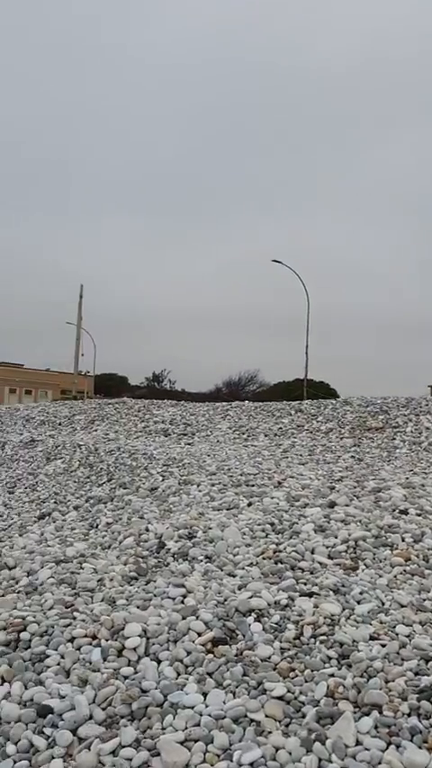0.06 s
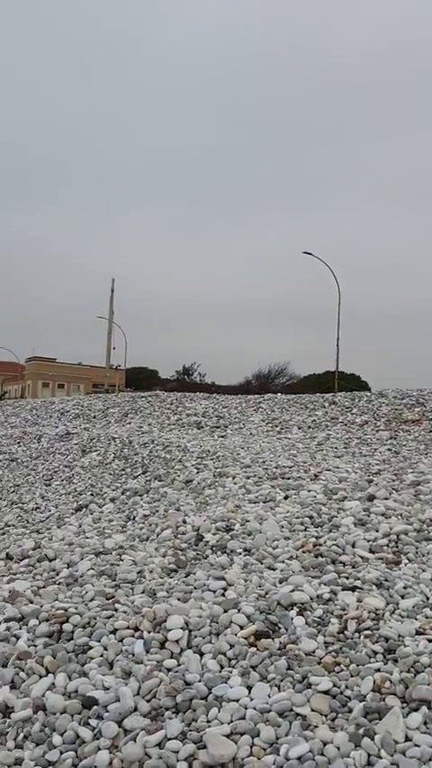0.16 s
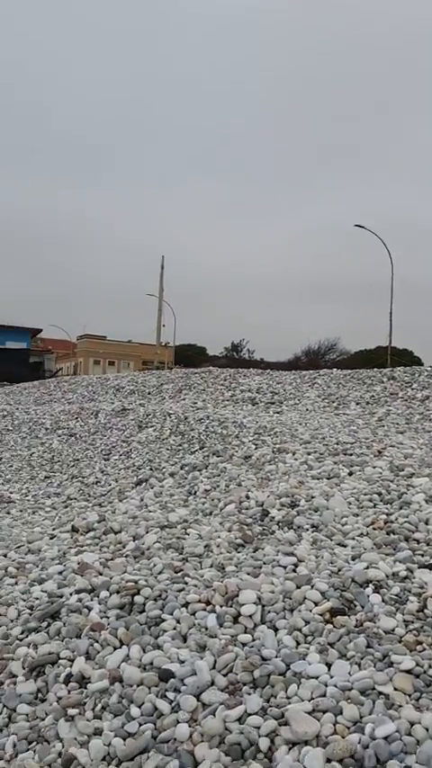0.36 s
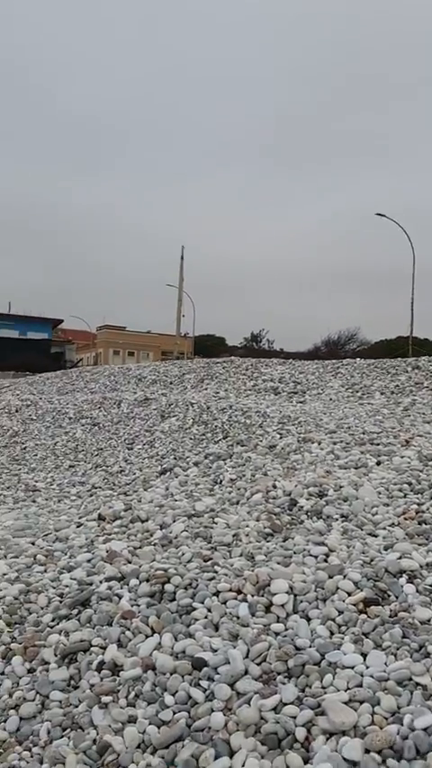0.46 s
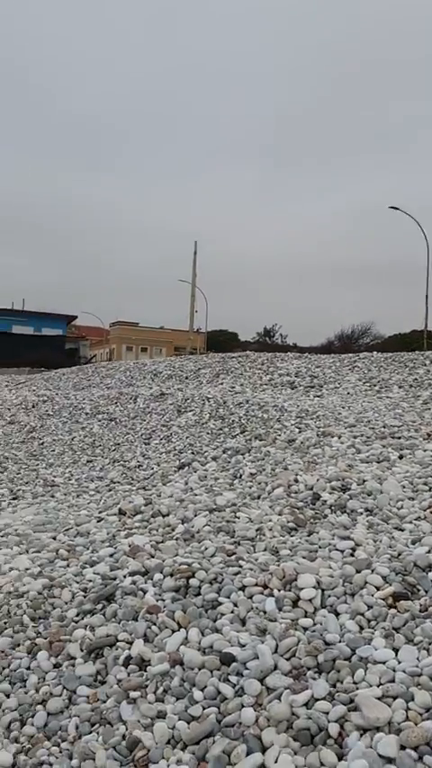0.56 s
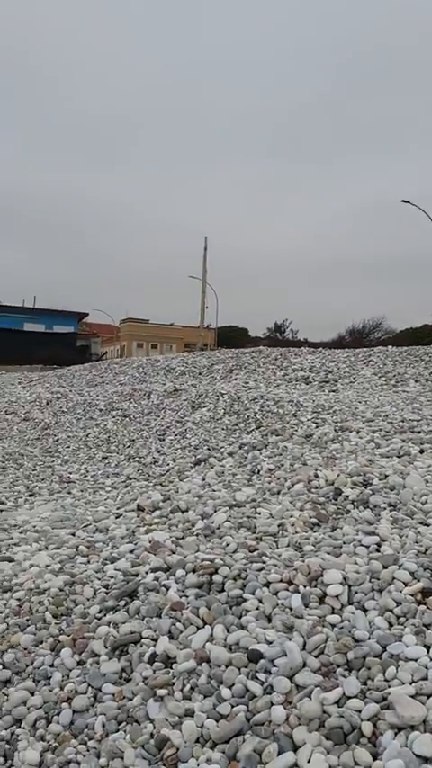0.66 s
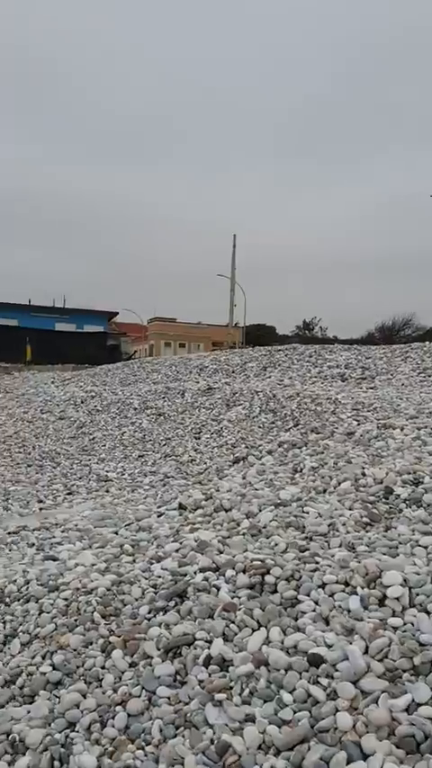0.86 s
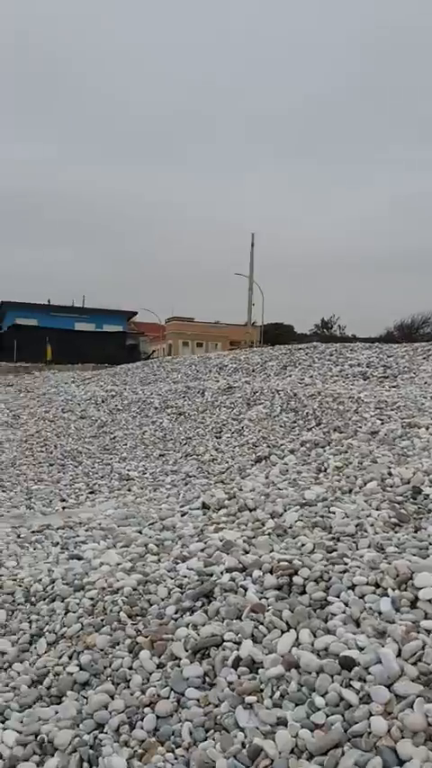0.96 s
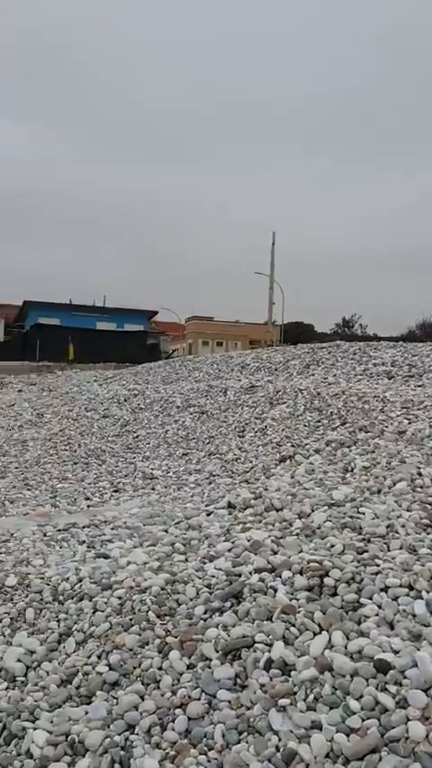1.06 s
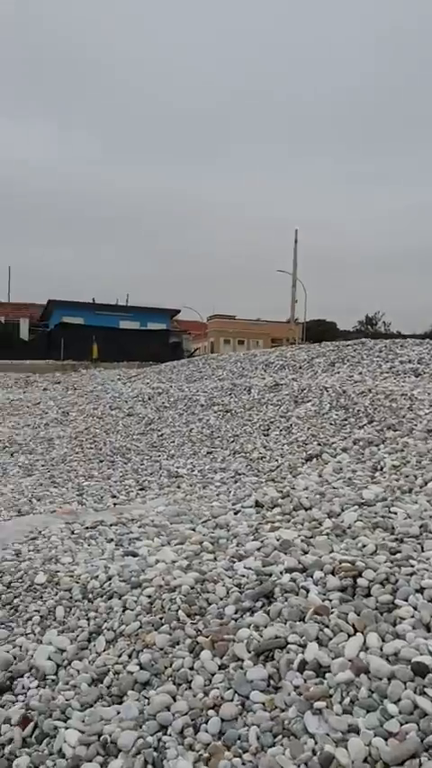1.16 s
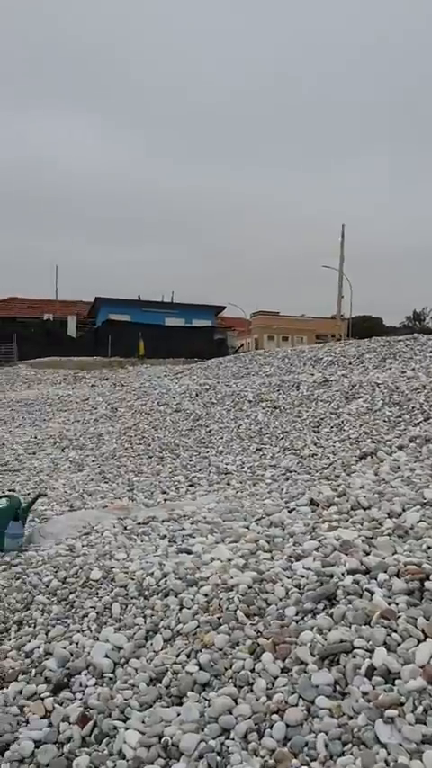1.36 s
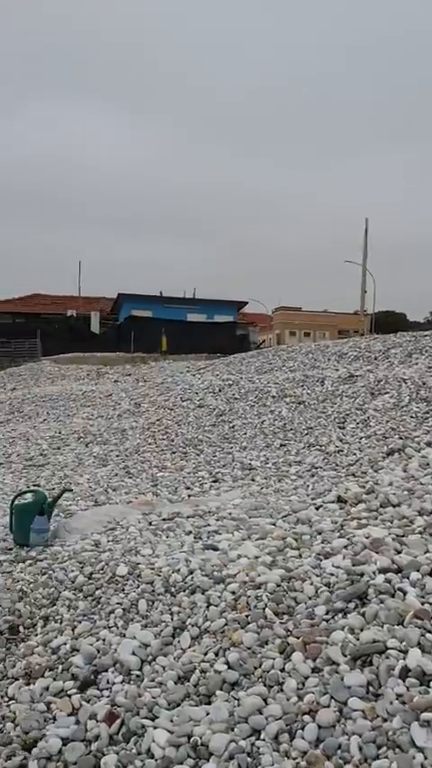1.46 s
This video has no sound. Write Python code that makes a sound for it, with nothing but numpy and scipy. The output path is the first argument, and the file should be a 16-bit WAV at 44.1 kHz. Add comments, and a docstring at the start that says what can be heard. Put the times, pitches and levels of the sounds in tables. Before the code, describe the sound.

Two close footsteps crunch over loose pebbles in irregular bright bursts, with stone knocks and small metallic clinks, then a light trickle; open beach, low rumble and faint hiss, stereo microphone nearby, steps slightly left.

```python
"""A beach of loose pebbles: two footsteps close by, a little to the left, with loose metal (keys or a chain).
Each step is a run of short bursts of random collisions, filtered into crack and crunch, ringing bright modes.
Decaying sines add metal clinks, hollow notes and a thin ring; shaped noise ticks are knocking stones.
Noise thuds and low sine bumps are the foot; sparse ticks trickle over low rumble and faint hiss."""
import sys
import numpy as np
from scipy import signal
from scipy.fft import rfft, irfft
from scipy.io import wavfile
from scipy.ndimage import uniform_filter1d

SR = 44100
rng = np.random.default_rng(int(sys.argv[2]) if len(sys.argv) > 2 else 0)


def master(y):
    """Save y as 16-bit WAV."""
    cut = np.clip(np.atleast_2d(y).T, -1, 1)
    pcm = np.round(cut * 32767)  # scale
    wavfile.write(sys.argv[1], SR, pcm.astype(np.int16))


N = 66150
T = np.arange(N) / SR


def amp(db):
    """Decibels to gain."""
    return 10 ** (np.asarray(db) / 20)


def unit(x):
    """Scales to rms 1."""
    return x / np.sqrt(np.mean(x ** 2) + 1e-20)


def read(points, hz):
    """Interpolates a spectrum table on a log-frequency axis."""
    f, value = np.transpose(points)
    return np.interp(np.log(hz + 1), np.log(np.abs(f) + 1), value)


def colour(x, db_at, size=4096):
    """Minimum-phase filter of unit energy with the given dB response, via the folded cepstrum."""
    db = np.maximum(db_at(np.fft.rfftfreq(size, 1 / SR)), -90)
    cepstrum = irfft(np.log(amp(db)))
    cepstrum[1:size // 2] *= 2
    cepstrum[size // 2 + 1:] = 0
    taps = irfft(np.exp(rfft(cepstrum)))
    return signal.fftconvolve(x, taps / np.linalg.norm(taps))[:len(x)]


def shaped(x, points):
    """Colours a sound by a spectrum table."""
    return colour(x, lambda f: read(points, f))


def band(x, hz, octaves):
    """A broad resonance around hz."""
    def db_at(f):
        offset = np.log2((f + 1) / hz) / octaves
        return -20 * np.log10(1 + offset ** 2 / 2)
    return colour(x, db_at)


def random_signs(count):
    """Random polarity per sample."""
    return rng.choice([-1., 1.], count)


def hits(rate_per_s, spread_db):
    """Random collisions of uneven size, levelled towards a steady mean power."""
    size = amp(spread_db * np.minimum(rng.exponential(1, N), 4))
    x = size * random_signs(N) * (rng.random(N) < rate_per_s / SR)
    power = np.abs(uniform_filter1d(x ** 2, size=300))
    return x / np.sqrt(power + 0.0017)


RING_RISE_S = 0.00044


def ring(start_s, hz, db, t60_s):
    """One partial: a sine of random phase, quick linear rise, exponential decay."""
    t = np.maximum(T - start_s, 0)
    level = amp(db - 60 * t / t60_s) * np.minimum(t / RING_RISE_S, 1)
    return level * np.sin(2 * np.pi * (hz * t + rng.random()))


# bursts of collisions: t/s, length/s, level/dB, relative crunch level/dB
BURSTS = [(0.2366, 0.0034, -34.5, -6.5), (0.273, 0.012, -34.5, -6.5), (0.296, 0.041, -43.5, -8),
          (0.33, 0.0054, -33.5, -24), (0.336, 0.015, -36, 1), (0.367, 0.022, -39.5, -2),
          (0.402, 0.0034, -35, -7), (0.423, 0.033, -45, 3), (0.4396, 0.0069, -32, -5),
          (0.451, 0.022, -35, -1.5), (0.475, 0.0046, -31, -9), (0.483, 0.0025, -26.5, -2),
          (0.497, 0.008, -41, 5.5), (0.516, 0.0096, -37, 2.5), (0.532, 0.017, -36.5, -2),
          (0.559, 0.03, -38, 1.5), (0.584, 0.0068, -38, 3), (0.605, 0.089, -49.5, -9),
          (0.679, 0.021, -50, 11), (0.894, 0.022, -44.5, -3.5), (0.9115, 0.0051, -34.5, -3.5),
          (0.922, 0.0069, -53.5, 12), (.963, 0.0098, -30.5, -6.5), (0.97, 0.011, -35, 5),
          (1.008, 0.021, -33, -3.5), (1.033, 0.0064, -39.5, 2.5), (1.054, 0.033, -37.5, -2),
          (1.065, 0.017, -30, 1), (1.087, 0.015, -33, -4), (1.113, 0.011, -30.5, -2),
          (1.1607, 0.0027, -40.5, 0.5), (1.184, 0.015, -50, 9)]
# spectrum of the cracks: f/Hz, level/dB
CRACK_SPECTRUM = [(1410, -44.5), (2400, -5.5), (3220, -13.5), (4640, 0.5), (7060, -3.5), (9110, -1),
                  (14000, -5.5), (15100, -3.5), (16000, -30)]
# spectrum of the low crunch: f/Hz, level/dB
CRUNCH_SPECTRUM = [(150, -20), (450, -7), (750, -14), (1150, -3.5), (1500, -2), (2200, 4.5), (3200, .5),
                   (4400, 1), (6000, -6), (10000, -20)]
# ringing modes shared by all collisions: f/Hz, relative level/dB, t60/s
MODES = [(2440, -11, .1), (2700, -13, .09), (4350, -9, .1), (4735, -7, .07), (5295, -8, .08),
         (6470, -8, .09), (7440, -7, .09), (8125, 0, .09), (8980, -1, .09), (9690, 0, .1), (10160, -3, .11),
         (10650, -5, .06), (11730, -3, .08), (12200, -8, .08), (13230, -10, .07)]
HITS_PER_S, SIZE_SPREAD_DB = 1900, 3
SWELL = .15  # share of a burst's length over which it builds up
RELEASE_S = 0.013
SETTLE_DB, SETTLE_S = -23, 0.016  # stones keep shifting after each burst
CLUSTER_DB, CLUSTER_S = 3, .0022  # short resonances of each stone cluster, dB re direct hit
STONE_SPREAD_OCT = .16  # each burst moves stones of a different size
CRACK_DB, CRUNCH_DB, RING_DB = -3.8, -7.5, -7


def burst_level(t, length_s):
    """Linear build-up, hold, then the louder of fast release and settling tail."""
    after = np.maximum(t - length_s, 0)
    release = np.exp(-after / RELEASE_S)
    settle = amp(SETTLE_DB) * np.exp(-after / SETTLE_S)
    return np.minimum(t / (SWELL * length_s), 1) * np.maximum(release, settle)


def stone_cluster(count=512):
    """Impulse response of a stone cluster: direct hit plus decaying noise, unit energy."""
    cluster = rng.standard_normal(count) * np.exp(-T[:count] / CLUSTER_S)
    cluster *= amp(CLUSTER_DB) / np.linalg.norm(cluster)
    cluster[0] = 1
    return cluster / np.linalg.norm(cluster)


def mode_rings(drive, t):
    """Collisions of random polarity excite decaying sines."""
    rings = np.zeros(N)
    total = np.linalg.norm([amp(db) for _, db, _ in MODES])
    for hz, db, t60_s in MODES:
        mode = np.exp(-np.log(1000) * t / t60_s) * np.sin(2 * np.pi * hz * t)
        excitation = drive * random_signs(N)
        rings += amp(db) / total * signal.fftconvolve(excitation, mode / np.linalg.norm(mode))[:N]
    return rings


def bursts(size=8192):
    """Each burst of collisions cracks, crunches and sets the modes ringing."""
    drive, crunch = np.zeros((2, N))
    collisions = hits(HITS_PER_S, SIZE_SPREAD_DB)
    t = T[:size]
    for start_s, length_s, db, crunch_db in BURSTS:
        first = round(start_s * SR)
        span = slice(first, first + size)
        blows = amp(db) * burst_level(t, length_s) * collisions[span]
        cluster = stone_cluster()
        drive[span] += signal.fftconvolve(blows, cluster)[:size]
        grind = signal.fftconvolve(blows * random_signs(size), cluster)[:size]
        stone = 2 ** (STONE_SPREAD_OCT * rng.uniform(-1, 1))
        crunch[span] += amp(crunch_db) * colour(grind, lambda f: read(CRUNCH_SPECTRUM, f * stone))
    crack = shaped(drive, CRACK_SPECTRUM)
    return amp(CRACK_DB) * crack + amp(CRUNCH_DB) * crunch + amp(RING_DB) * mode_rings(drive, t)


# clear metal clinks that stand out of the bursts: t/s, f/Hz, level/dB, t60/s
CLINKS = [(0.2362, 2584, -50.5, 0.23), (0.2379, 5305, -37, 0.18), (0.235, 6110, -39, 0.08),
          (0.2368, 9680, -38, 0.21), (0.2355, 11680, -39, 0.83), (.275, 10220, -38, 0.53),
          (0.287, 8980, -44, 0.32), (.338, 9700, -31.5, 0.085), (.372, 8100, -36, 0.063),
          (0.404, 8900, -39, 0.38), (.4445, 8050, -24, 0.064), (0.4449, 8940, -28.5, 0.15),
          (0.444, 9930, -30, 0.088), (.486, 9870, -26.5, 0.13), (0.487, 10350, -30, 0.053),
          (.495, 8100, -37, 0.091), (.533, 2456, -34.5, 0.12), (0.546, 7440, -41.5, 0.13),
          (.915, 11440, -24, 0.034), (1.014, 11670, -31.5, 0.079), (1.07, 2695, -35, 0.12),
          (1.114, 10020, -30.5, 0.061), (1.219, 3096, -52, 0.23), (1.161, 11710, -32.5, 0.049),
          (1.162, 10060, -51.5, 0.6)]
# hollow notes of deeper stones under the second step: f/Hz, level/dB, t60/s
HOLLOW = [(557, -51, 0.23), (840, -44, 0.13), (1132, -40, 0.16), (1710, -36, 0.14)]
HOLLOW_AT_S = 1.07
# loose metal pieces (keys or a chain) keep touching and roughen the ringing note
CHATTER, CHATTER_S = .7, .0025


def clinks():
    """Loose metal rings single notes, roughened by slow noise; deeper stones add a hollow knock."""
    keep = np.exp(-1 / (CHATTER_S * SR))
    out = sum(ring(HOLLOW_AT_S, *mode) for mode in HOLLOW)
    for clink in CLINKS:
        chatter = unit(signal.lfilter([1], [1, -keep], rng.standard_normal(N)))
        out += ring(*clink) * (1 + CHATTER * chatter)
    return out


# single stones knocking: t/s, peak level/dB before the ports, f/Hz
KNOCKS = [(.0612, -25, 3730), (.0675, -34, 3220), (.1035, -29, 4730), (.1612, -30.5, 11500),
          (0.2362, -24, 6070), (.3452, -20, 4500), (.3548, -16, 8000), (.4078, -15, 4900),
          (.4848, -12, 3900), (.5377, -19, 2300), (.6415, -33, 2660), (.6545, -25, 6800),
          (.6858, -24, 4970), (.7855, -35.5, 1880), (.810, -37, 850), (.8145, -34, 1240),
          (.8545, -20, 2140), (1.0395, -25, 3520), (1.0695, -25, 2100), (1.114, -14.5, 4500),
          (1.121, -23.5, 1550), (1.125, -20, 7400), (1.163, -30, 9000), (1.199, -27, 2920),
          (1.2808, -32, 2980), (1.312, -36.5, 3100), (1.3455, -32.5, 1620), (1.3639, -37, 1420),
          (1.369, -37.5, 473), (1.3825, -33, 3900), (1.407, -35, 4070), (1.4535, -43, 2580)]
KNOCK_WIDTH_OCT = 0.57
KNOCK_S, KNOCK_TAIL_DB, KNOCK_TAIL_S = 0.00009, -25, 0.01
KNOCK_TOP_HZ = 11000  # rounded stones strike softly above this


def knocks(size=2048):
    """One stone strikes another: an impulse with a brief noise rattle, band-shaped."""
    out, t = np.zeros(N + size), T[:size]
    soften = signal.butter(1, KNOCK_TOP_HZ, fs=SR)
    for start_s, db, hz in KNOCKS:
        decay = np.exp(-t / KNOCK_S) + np.exp(-t / KNOCK_TAIL_S) / 2
        blow = amp(KNOCK_TAIL_DB) * decay * rng.standard_normal(size)
        blow[0] = 1
        tick = signal.lfilter(*soften, band(blow, hz, KNOCK_WIDTH_OCT))
        out[round(start_s * SR):][:size] += amp(db) * tick / np.abs(tick).max()
    return out[:N]


# dull pushes of the foot into the bed: t/s, rise/s, decay/s, level/dB, centre f/Hz
THUDS = [(0.24, 0.025, 0.047, -54, 207), (0.511, 0.01, 0.033, -53, 305), (0.59, 0.027, 0.062, -42.5, 268),
         (.79, 0.03, 0.056, -50.5, 553), (0.873, 0.018, 0.016, -48, 89), (1.021, 0.017, 0.054, -49.5, 65),
         (1.039, 0.017, 0.033, -48.5, 270), (1.36, 0.1, 0.064, -51.5, 193)]
THUD_WIDTH_OCT = .9


def thuds():
    """The foot's weight shifts deeper stones: band noise, its envelope flattened, then swelled and decayed."""
    out = np.zeros(N)
    for start_s, rise_s, decay_s, db, hz in THUDS:
        t = np.maximum(T - start_s, 0)
        level = np.minimum(t / rise_s, 1) * np.exp(-np.maximum(t - rise_s, 0) / decay_s)
        rumble = band(rng.standard_normal(N), hz, THUD_WIDTH_OCT)
        even = np.cos(np.angle(signal.hilbert(rumble)))
        push = level * band(even, hz, THUD_WIDTH_OCT)
        out += amp(db) * push * np.linalg.norm(level) / np.linalg.norm(push)
    return out


# soft bumps of heel and sole: t/s, f/Hz, level/dB before low-pass, t60/s
BUMPS = [(.056, 56, -41, .2), (.4915, 340, -35, .03), (.4955, 120, -41, .04), (.596, 335, -41, .09),
         (.637, 285, -41, .07), (.691, 205, -41, .07)]


def bumps():
    """Heel and sole land with short low sines, low-passed an octave above pitch."""
    out = np.zeros(N)
    for start_s, hz, db, t60_s in BUMPS:
        out += signal.lfilter(*signal.butter(2, 2 * hz, fs=SR), ring(start_s, hz, db, t60_s))
    return out


# thin ring hanging from earlier: f/Hz, level/dB, t60/s
HANGING = [(1652, -56, .45), (4344, -47, .85), (5303, -59, .7), (6772, -62, .45), (7574, -62, .4),
           (8376, -60, .8), (8866, -54, .32), (9065, -55, .6), (9905, -56, .55), (10178, -49.5, .6)]
DAMPED_S = 0.34


def hanging_ring():
    """Long partials die away until the first step damps them."""
    damping = np.exp(-np.maximum(T - DAMPED_S, 0) / RELEASE_S)
    return sum(ring(0, *partial) for partial in HANGING) * damping


# course of the gravel trickle: t/s, level/dB
TRICKLE_LEVEL = [(0, -55), (.12, -59), (.22, -62.5), (.3, -52), (.6, -48), (.72, -50), (.78, -57.5),
                 (.88, -53.5), (1.15, -51.5), (1.25, -55.5), (1.32, -61.5), (1.5, -53.5)]
# spectrum of the trickle: f/Hz, level/dB
TRICKLE_SPECTRUM = [(290, -25.5), (500, -6), (954, -6), (1450, -4), (2160, -5), (3740, -4.5), (7000, -11.5),
                    (11000, -11.5), (15500, -16.5)]
TRICKLE_PER_S, TRICKLE_SPREAD_DB = 1700, 3.2
FLURRY_DB, FLURRY_S = 2, .012


def trickle():
    """Small stones tick on under and between the bursts, in uneven flurries."""
    ticks = shaped(hits(TRICKLE_PER_S, TRICKLE_SPREAD_DB), TRICKLE_SPECTRUM)
    flurry = unit(uniform_filter1d(rng.standard_normal(N), round(FLURRY_S * SR)))
    level_db = np.interp(T, *np.transpose(TRICKLE_LEVEL))
    return amp(level_db) * unit(ticks * amp(FLURRY_DB * flurry))


# spectrum of the open air: f/Hz, level/dB
AIR_SPECTRUM = [(20, -18), (35, -5), (52, 4), (66, -8.5), (81, 4.5), (105, -7), (180, -10.5), (400, -15),
                (800, -32.5), (2000, -33), (5000, -38), (15000, -31)]
AIR_DB, AIR_APART, AIR_LEFT_DB = -54.5, 0.25, 4  # side share re mid; left minus right


def air():
    """Low outdoor rumble and faint hiss: shaped noise, mostly shared by both sides, stronger left."""
    mid, side = (unit(shaped(rng.standard_normal(N), AIR_SPECTRUM)) for _ in range(2))
    left = (mid + AIR_APART * side) * amp(AIR_LEFT_DB / 2)
    right = (mid - AIR_APART * side) * amp(-AIR_LEFT_DB / 2)
    return amp(AIR_DB) * np.array([left, right])


# level difference of the ports: f/Hz, left minus right/dB
LEFT_LEAD = [(60, 0), (87, -7), (130, 2), (180, -3), (260, 1.5), (380, 8), (550, 13), (790, 9.5), (1140, 8),
             (1650, 2.5), (2380, 6), (3440, 11.5), (4970, 0.5), (7180, 11.5), (10400, 0.5), (15000, 8)]
# phase of the left port: f/Hz, left lead/rad
LEFT_PHASE = [(0, -0.5), (860, -1.3), (2410, -1.77), (3530, -2.5), (4310, -5.5), (5340, -5.5), (5940, -4),
              (6800, -9.5), (9130, -5.5), (12300, -6.5), (13000, 0), (14100, -3), (14400, -9.5),
              (16500, -7)]
SCATTER_DB, SCATTER_S = -9, 0.0034  # ground scatter, dB re direct sound


def ports(centre, spread, size=1024):
    """Two microphone ports with own colour, phase and ground scatter; spread stones reach them in antiphase."""
    count = N + 2 * size
    f = np.fft.rfftfreq(count, 1 / SR)
    scatter = rng.standard_normal((2, size)) * np.exp(-T[:size] / SCATTER_S)
    scatter *= amp(SCATTER_DB) / np.linalg.norm(scatter, axis=1, keepdims=True)
    lead = amp(read(LEFT_LEAD, f) / 2)
    phase = np.interp(f, *np.transpose(LEFT_PHASE))
    direct = np.array([lead * np.exp(1j * phase), 1 / lead])
    response = direct * (1 + rfft(scatter, count))
    sides = np.array([centre + spread, centre - spread])
    return irfft(rfft(sides, count) * response, count)[:, :N]


APART = .64  # gain of the independent spread layer


def scene():
    """Steps, loose stones, clinking metal and the open air; bumps and air bypass the ports."""
    centre = bursts() + clinks() + knocks() + thuds() + trickle() + hanging_ring()
    spread = APART * (bursts() + trickle())  # fresh random collisions
    return ports(centre, spread) + bumps() + air()


CUT_HZ = 15900


def record(dry):
    """The recorder's band limit: a linear-phase low-pass."""
    taps = signal.firwin(511, CUT_HZ, window=("kaiser", 9), fs=SR)
    return signal.oaconvolve(dry, taps[None], "same")


dry = scene()
out = record(dry)
master(out)
```